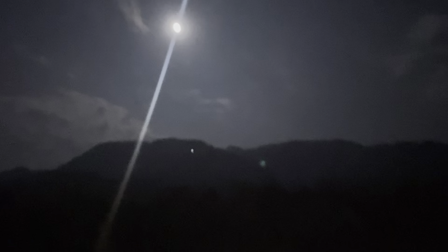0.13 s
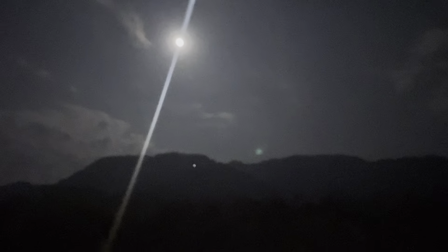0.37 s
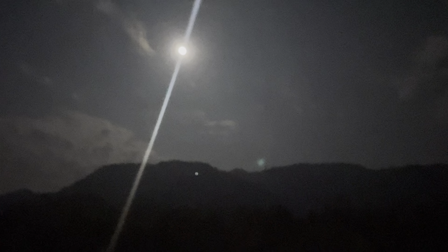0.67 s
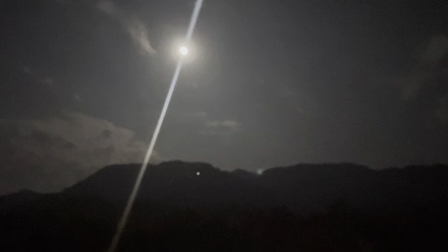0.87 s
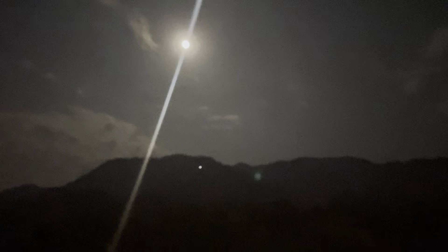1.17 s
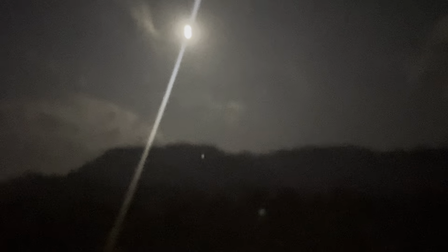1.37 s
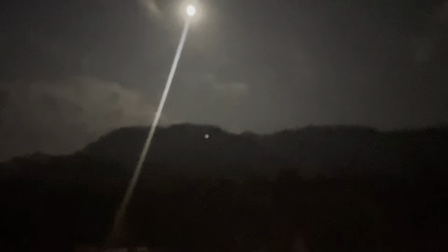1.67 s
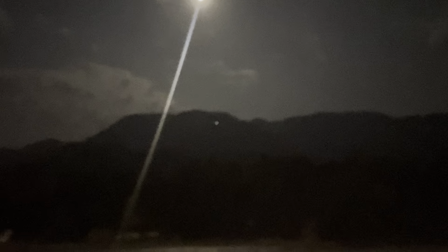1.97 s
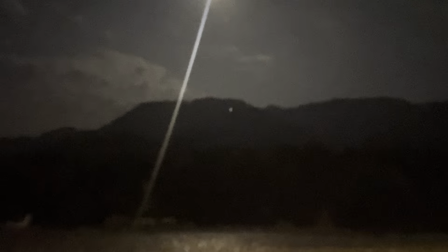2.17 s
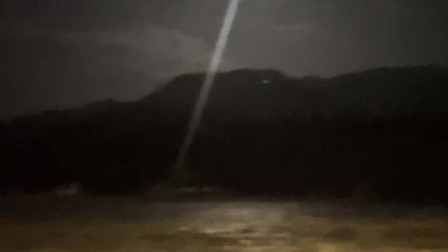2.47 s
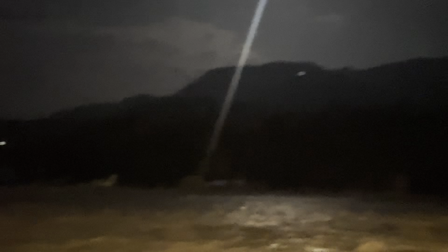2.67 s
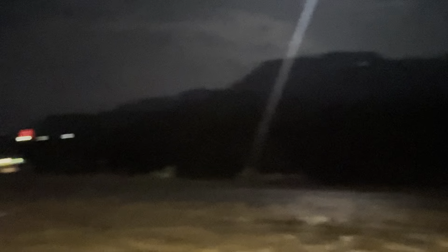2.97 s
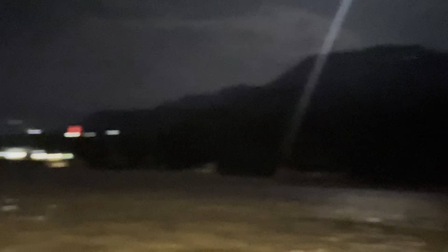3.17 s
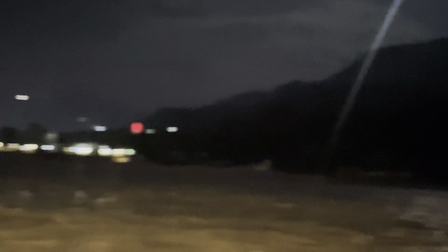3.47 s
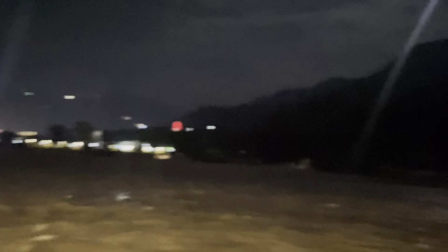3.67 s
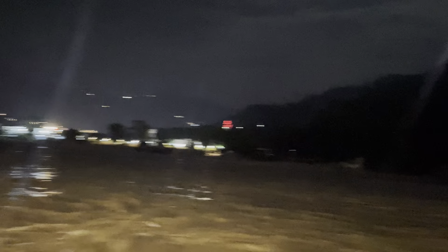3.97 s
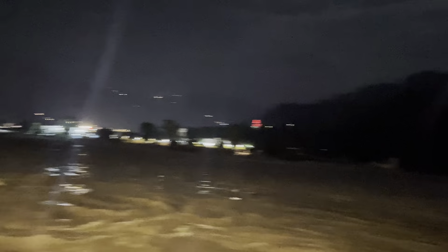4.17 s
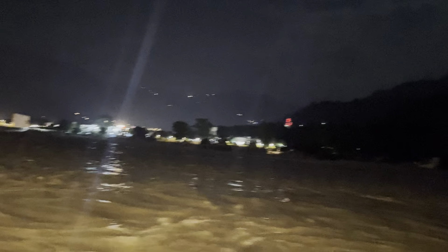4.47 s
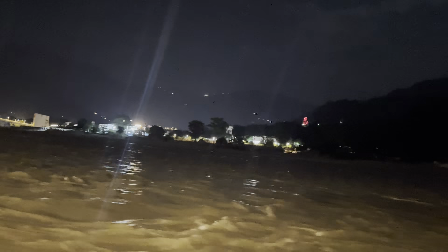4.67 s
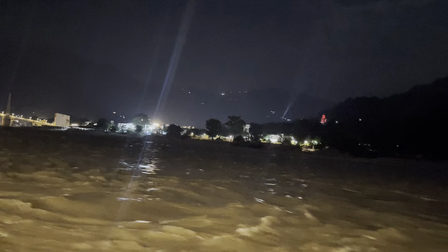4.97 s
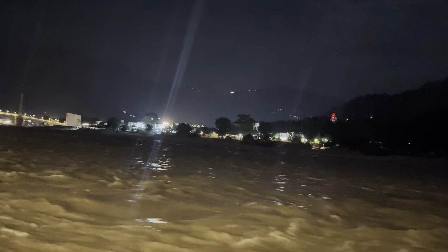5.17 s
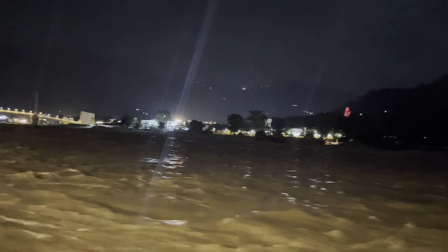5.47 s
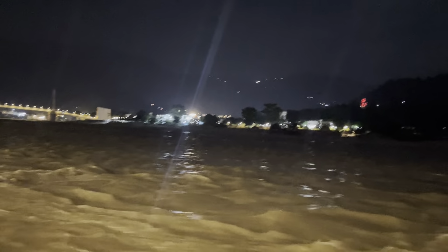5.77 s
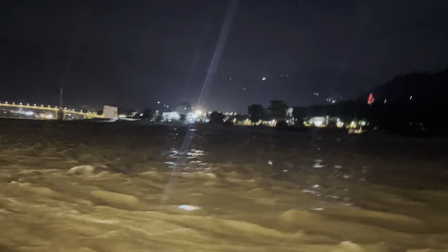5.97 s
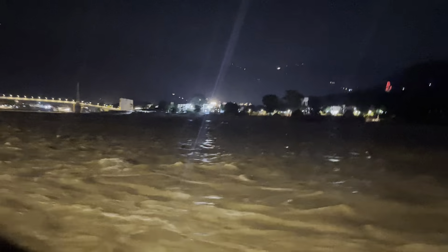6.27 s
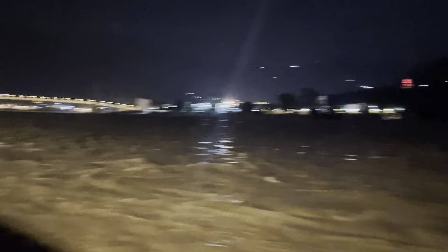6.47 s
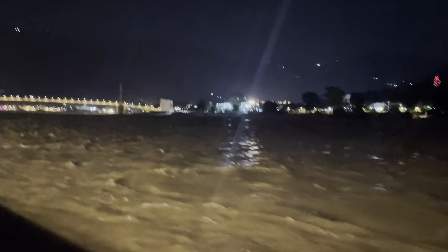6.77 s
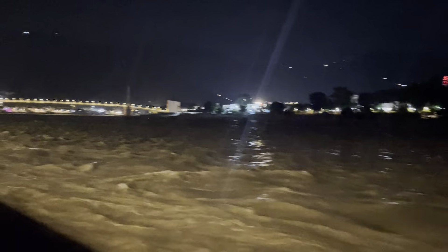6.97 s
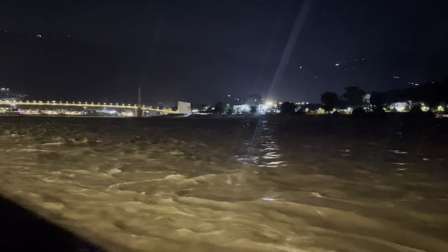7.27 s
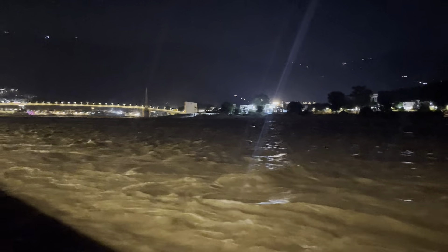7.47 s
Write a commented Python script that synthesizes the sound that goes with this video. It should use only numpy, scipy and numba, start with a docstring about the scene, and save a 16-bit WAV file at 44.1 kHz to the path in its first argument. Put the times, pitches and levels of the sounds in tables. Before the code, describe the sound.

A steady, dense rush of turbulent water runs throughout, close and wide in stereo, with little gurgles, slaps and plinking drops. Low wind buffeting bumps the phone microphone in irregular bursts during the first half, heaviest just after one second. From about four seconds the wind is mostly a faint rumble; near six seconds waves break harder, with brief rounded low gulps, before the river settles slightly darker.

```python
"""River bank: a swollen river rushes past while a phone turns slowly from the hills to the rapids. The river is
coloured noise (the rush) plus swarms of ringing bubbles, lifted by surges. Near crests slap as short resonant
noise bursts; drops and deep gulping bubbles are single decaying sines. Wind is low noise with gusts and
pressure pulses; two ports hear it all with lag and shade."""
import sys
import numpy as np
from scipy import signal
from scipy.fft import rfft, irfft
from scipy.io import wavfile
from scipy.ndimage import map_coordinates
from numba import njit

SR = 44100
rng = np.random.default_rng(int(sys.argv[2]) if len(sys.argv) > 2 else 0)


def output_pcm(signal):
    """Save a mono or channel-first signal as 16-bit PCM at the path in sys.argv[1].

    Samples are clipped to [-1, 1] before scaling.
    """
    pcm = np.clip(np.atleast_2d(signal).T, -1, 1) * 32767
    wavfile.write(sys.argv[1], SR, np.round(pcm).astype(np.int16))


N = 336042
T = np.arange(N) / SR
FRAME, HOP = 512, 128  # samples, short spectra

# wind rumble, relative spectrum before scaling to rms 1: (frequency [Hz], density [dB per Hz])
WIND_COLOUR = [(12, -32), (27, -26), (48, -6), (76, 1.5), (120, -2.5), (180, -7), (300, -20), (600, -53),
               (2000, -65)]
# steady breeze under the gusts, stronger once the phone faces the open water: (time [s], level [dB])
BREEZE_LEVELS = [(0, -44), (.6, -42.5), (2.2, -40.5), (3.8, -38.5), (4.8, -37.5), (5.8, -38.7), (7.62, -41)]
# gusts on the microphone: (start [s], hold [s], level [dB])
WIND_GUSTS = [(0.02, 0.025, -37), (0.763, 0.023, -28), (0.907, 0.067, -29.5), (1.02, .02, -40),
              (1.067, 0.15, -31), (1.233, 0.089, -30), (1.461, 0.06, -31), (1.594, 0.26, -34),
              (2.031, 0.082, -33), (2.535, 0.19, -37), (2.87, 0.3, -38), (3.155, 0.19, -37),
              (3.905, 0.044, -32), (4.11, 0.093, -43), (4.524, 0.027, -39)]
GUST_ATTACK_S, GUST_RELEASE_S = 0.025, 0.05
# strong eddies that hit the ports: (time [s], frequency [Hz], peak [dB], length to 1/e [s])
WIND_EDDIES = [(.07, 138.5, -32, 0.019), (.811, 124, -23.5, 0.011), (0.83, 85, -24.5, 0.014),
               (.986, 100.3, -18.5, 0.012), (1.275, 88, -12, 0.013), (1.317, 69, -18, 0.018),
               (1.517, 112, -19, 0.0046), (1.525, 176, -25, 0.016), (1.543, 54.4, -28, 0.059),
               (1.638, 139, -26.5, 0.011), (1.7, 85, -26, .016), (1.735, 140, -24, .014),
               (1.779, 105, -20, 0.0053), (1.814, 75, -22, 0.013), (1.843, 164, -26, 0.018),
               (1.897, 95, -25, 0.0097), (2.132, 148, -27, 0.021), (2.977, 79, -27.5, 0.034),
               (3.08, 70, -23, 0.015), (3.199, 55.6, -31, 0.018), (3.315, 79, -32, 0.021),
               (3.97, 80, -23.5, 0.015), (4.051, 65.6, -25, 0.013), (4.57, 86, -31, .016),
               (6.613, 90, -28, 0.009)]
# harder wind sheds smaller, higher eddies; they equal the rumble at this wind level
BUFFET_HZ, BUFFET_EQUAL_DB = 177, -19.5
# gusts alone heave, lower than the buffeting; level is relative to the gust's rumble
HEAVE_HZ, HEAVE_DB = 50, -9

# waves that break near the bank and the spits they throw:
# (time [s], centre [Hz], level [dB], length to 1/e^2 [s])
BANK_SPLASHES = [(.094, 880, -33, 0.011), (0.355, 1040, -34, 0.015), (0.4054, 10500, -43, 0.00066),
                 (0.592, 2500, -34, .006), (0.923, 3500, -37.5, .007), (1.052, 9200, -42, .002),
                 (1.1, 2000, -38.5, 0.018), (1.208, 3400, -40, 0.016), (1.438, 1110, -34, 0.025),
                 (1.445, 2640, -39, .02), (1.595, 8200, -43, .008), (1.634, 2650, -40, 0.013),
                 (2.022, 7150, -44, 0.014), (2.04, 1190, -40, 0.027), (2.155, 1480, -54, .018),
                 (2.418, 1900, -47, .015), (2.476, 1350, -38, .012), (2.498, 9200, -49, .008),
                 (3, 5000, -44, .008), (3.037, 1050, -34, .01), (3.06, 1400, -34, .02),
                 (3.294, 1700, -39, 0.0071), (3.296, 2900, -41, .005), (3.457, 7500, -44, 0.016),
                 (3.461, 3900, -38, 0.0062), (3.582, 2220, -42, 0.023), (3.647, 480, -32, 0.012),
                 (3.713, 1250, -33, 0.011), (3.915, 2280, -41, .009), (4.4783, 8000, -42, 0.00092),
                 (4.544, 3500, -43, .014), (4.548, 1250, -34, .016), (4.578, 2300, -43, 0.016),
                 (4.715, 574, -31, 0.013), (5.168, 1250, -37, .011), (5.851, 960, -30, .012),
                 (5.859, 1820, -33, 0.012), (5.886, 620, -32.5, .014), (5.898, 3100, -39, 0.012),
                 (5.926, 1620, -40, .01), (5.943, 1200, -38, .01), (6.251, 680, -34, 0.029),
                 (6.283, 3960, -42.5, 0.018), (6.386, 680, -35, 0.017), (6.39, 5400, -44, .009),
                 (6.478, 760, -34.5, 0.038), (6.6774, 12400, -47, .0007), (6.905, 570, -40, .018),
                 (6.9681, 9400, -44, .0008), (7.176, 1770, -46, 0.015)]
# deep gulping bubbles, decaying sines: (time [s], pitch [Hz], level [dB], ring [cycles])
LOW_GULPS = [(4.728, 280.4, -25, 34), (6.222, 267, -19.5, 20), (6.3, 282, -20, 25), (6.373, 271, -20, 26),
             (6.575, 233, -25.5, 31)]
# single bubbles and drops: (time [s], pitch [Hz], level [dB], ring [cycles])
WATER_DROPS = [(.405, 11500, -27.5, 40), (.725, 4800, -35, 40), (1.415, 1090, -25.5, 42),
               (1.441, 1110, -24.5, 36), (1.452, 1190, -31, 30), (3.291, 1770, -27, 42),
               (3.367, 2580, -36, 45), (4.478, 8500, -33, 45), (5.165, 1310, -33.5, 55),
               (5.599, 1360, -32, 55), (5.939, 1350, -30.5, 38), (6.6774, 12400, -39, 45),
               (6.968, 11000, -40, 50)]

# surges, where the current heaps up and breaks:
# (start [s], hold [s], change of roar [dB], of foam [dB], of spray [dB])
RIVER_SURGES = [(0, .1, 1, 0.78, -0.5), (0.559, .2, 0, 1.13, 1), (1, .42, 1, 3.5, 3),
                (1.918, .06, 1.5, 1.18, 0.5), (2.329, .26, 0.6, 1.61, 2), (2.72, .28, 0.9, 0.78, 0.3),
                (3.42, .33, 1.5, 1.48, 1.5), (4.378, .2, 1.2, 1.5, 2), (5.79, .22, -0.5, 3, 1.5),
                (6.19, .15, 1.5, 3, 3.5), (6.649, .08, 0, 1, -0.5), (6.859, .08, 0, 0.32, 0.5),
                (7.1, .1, 0, 0.58, 1.5)]
SURGE_ATTACK_S, SURGE_RELEASE_S = .06, .13
# river between surges; its spray fades as the phone turns: (time [s], foam [dB], spray [dB])
CALM_RIVER = [(0, 0.5, 8), (.45, -1, 5), (.8, -0.8, 5), (1.7, 0, 5.5), (3, -0.6, 3.5), (4.25, -1, -1),
              (4.85, 0.5, -1.5), (5.2, -1.1, -2), (5.5, 0.1, -1), (6.7, -.5, -2.5), (7.15, -1.5, -7.5),
              (7.62, 0.1, -5)]
ROAR_DB = 0.22  # between surges
# colour of the water before surges and patches:
# (frequency [Hz], facing hills [dB per Hz], facing midstream [dB per Hz], facing rapids [dB per Hz])
WATER_COLOUR = [(35, -103, -100.5, -95), (104, -60, -72, -63), (188, -63, -60.5, -61), (270, -62, -61, -58),
                (460, -62, -64, -63), (586, -64, -64, -65.5), (765, -69, -69, -63), (863, -68, -70, -70),
                (980, -70.5, -66.5, -67.5), (1190, -72.5, -71, -71), (1470, -71, -72.5, -72),
                (1680, -74.5, -75.5, -76.5), (1990, -74.5, -78, -77), (2690, -78, -78.5, -77),
                (3520, -79.5, -80, -81), (4620, -83.5, -83, -85), (5700, -86, -85.5, -85),
                (6930, -91, -86.5, -82.5), (13500, -98, -98, -96.5), (15400, -100, -99.5, -99)]
# low roar, foam in the middle, fine spray at the top:
# (frequency [Hz], share above roar [0-1], share of spray [0-1])
WATER_LAYERS = [(500, 0, 0), (1700, 1, 0), (4000, 1, 0), (9500, 1, 1)]

# turn of the phone: (time [s], heading [0 hills - 1 rapids], left port's lag, high-frequency limit [ms],
# right port's shade [dB])
PHONE_TURN = [(0, 0.11, 0.18, 3.5), (1.5, 0.024, 0.21, 2), (2.2, 0.086, 0.19, 4), (2.9, 0.28, 0.23, -0.5),
              (3.7, 0.54, 0.27, -2), (4.4, 0.6, 0.28, -2.5), (5.7, 0.97, 0.3, -4), (6.6, 1, 0.3, -6),
              (7.62, 1, 0.35, -4.5)]
# pair of ports: (frequency [Hz], likeness [0-1], share in step facing hills [1],
# share in step facing rapids [1], left minus right [dB], share of the shade [1])
PORT_PAIR = [(80, 0.71, 0.23, 1, -0.5, 0.0016), (285, 0.77, 0.29, 0.87, 2, 0), (395, 0.77, 0.28, 0, 2, 0),
             (570, 0.62, 0.075, 0, 0.5, 0.062), (740, 0.3, 0.012, 0.38, 0.5, 0.071),
             (910, 0.58, 0.36, 0, -0.5, 0), (1130, 0.57, 0.45, 0, -2, 0),
             (1860, 0.86, 0.65, 0.069, -1.5, 0), (2330, 0.86, 0.62, 0.18, 3, 0.9),
             (3300, 0.55, 0.41, 0.28, 2.5, 0.78), (4670, 0.74, 0.63, 0.45, 2.5, 0.28),
             (6200, 0, 0.37, 0.65, 5, 0.45), (6890, 1, 0, -4, -2, 0), (9300, 0.98, 0, 0, 1, 0),
             (11000, 0.94, 0, 0, -0.5, 0), (13800, 1, 0, 0, 0, 0)]
TREBLE_HZ, TREBLE_LAG_MS = 6600, .137
TOP_HZ = 15750


def amp(db):
    """Decibels to gain."""
    return 10 ** (np.asarray(db) / 20)


def unit(x):
    """Scale to rms 1."""
    return x / np.sqrt(np.mean(x ** 2))


def curves(table, t):
    """Columns of a time table at times t."""
    s, *columns = np.transpose(table)
    return [np.interp(t, s, c) for c in columns]


def spectra(table, hz):
    """Columns of a frequency table at hz, interpolated on a log axis."""
    points, *columns = np.transpose(table)
    return [np.interp(np.log(hz + 1), np.log(points), c) for c in columns]


def split(x):
    """Short spectra: column of frequencies, row of times, values."""
    hz, t, z = signal.stft(x, SR, nperseg=FRAME, noverlap=FRAME - HOP)
    return hz[:, None], t, z


def join(z):
    """Short spectra back to sound."""
    return signal.istft(z, SR, nperseg=FRAME, noverlap=FRAME - HOP)[1][..., :N]


def patches(hz, t, rate_hz, octaves):
    """Smooth random field of rms 1: new values rate_hz times a second, shared over some octaves."""
    where = np.broadcast_arrays(np.log2(1 + hz / 100) / octaves, t * rate_hz)
    grid = rng.standard_normal((48, 1024))
    return unit(map_coordinates(grid, where, order=2, mode="wrap"))


def envelope(t, start_s, hold_s, attack_s, release_s):
    """Envelope 0-1: straight rise, hold, exponential fall."""
    age_s = t - start_s
    fall_s = np.maximum(age_s - attack_s - hold_s, 0)
    return np.clip(age_s / attack_s, 0, 1) * np.exp(-fall_s / release_s)


def gusts(t):
    """Gust strength: each rises fast, holds and dies away; powers add."""
    each = [amp(db) * envelope(t, s, hold_s, GUST_ATTACK_S, GUST_RELEASE_S) for s, hold_s, db in WIND_GUSTS]
    return np.linalg.norm(each, axis=0)


def wind(flutter_db=1.5, buffet_width_hz=80, heave_width_hz=20):
    """Turbulence rumbles, buffets and heaves on the ports; an eddy is a short push and pull of pressure."""
    hz = np.arange(N // 2 + 1) * SR / N

    def noise(colour):
        return unit(irfft(rfft(rng.standard_normal((2, N))) * colour, N))

    def band(centre_hz, width_hz):
        return noise(1 / (1 + (2 * (hz - centre_hz) / width_hz) ** 2))

    gust = gusts(T)
    breeze = amp(curves(BREEZE_LEVELS, T)[0])
    strength = np.hypot(gust, breeze)
    rumble = strength * noise(amp(spectra(WIND_COLOUR, hz)[0]))
    flutter = np.interp(T, T[::HOP], patches(0, T[::HOP], rate_hz=24, octaves=1))
    # strength squared: buffeting outgrows the rumble
    buffet = strength ** 2 / amp(BUFFET_EQUAL_DB) * band(BUFFET_HZ, buffet_width_hz)
    heave = gust * amp(HEAVE_DB) * band(HEAVE_HZ, heave_width_hz)
    pressure = (rumble + buffet + heave) * amp(flutter_db * flutter)
    for s, eddy_hz, db, length_s in WIND_EDDIES:
        pulse = np.exp(-((T - s) / length_s) ** 2)
        pressure[0] += amp(db) * pulse * np.cos(2 * np.pi * eddy_hz * (T - s))
    return pressure


def splashes(relative_width=0.35):
    """Near crests slap and spit in short bursts of resonant noise."""
    out = np.zeros(N)
    for s, hz, db, length_s in BANK_SPLASHES:
        resonance = signal.iirpeak(hz, 1 / relative_width, SR)
        burst = unit(signal.filtfilt(*resonance, rng.standard_normal(8192)))
        t = (np.arange(len(burst)) - len(burst) // 2) / SR
        first = int((s + t[0]) * SR)
        out[first:first + len(t)] += amp(db) * burst * np.exp(-2 * (t / length_s) ** 2)
    return out


@njit
def ring(start_s, hz, size, cycles, rise):
    """Each ring is a sine that builds in about a cycle and dies within its cycles as its pitch rises."""
    out = np.zeros(N)
    for k in range(len(start_s)):
        length = int(cycles[k] * SR / hz[k]) + 1
        first = int(start_s[k] * SR)
        phase = 0.
        for i in range(min(length, N - first)):
            phase += 2 * np.pi * hz[k] * (1 + rise * i / length) / SR
            build = 1 - np.exp(-phase / 3)
            decay = np.exp(-6.9 * i / length)  # 60 dB over the ring
            out[first + i] += size[k] * build * decay * np.sin(phase)
    return out


def ring_table(table, rise):
    """Ring each row of a table once."""
    s, hz, db, cycles = np.array(table, float).T.copy()
    return ring(s, hz, amp(db), cycles, rise)


def surges(t):
    """Roar, foam and spray relative to calm [dB]: each surge builds, holds and ebbs."""
    return sum(np.outer(change_db, envelope(t, s, hold_s, SURGE_ATTACK_S, SURGE_RELEASE_S))
               for s, hold_s, *change_db in RIVER_SURGES)


def bubbles(count, low_hz, high_hz, cycles, spread_db, rise=0.053):
    """Near-flat swarm of rms 1: many faint bubbles and few loud ones, thicker when waves break."""
    when, pitch, luck, life, side = rng.random((count, 5)).T
    churn = np.cumsum(amp(surges(T)[1]))  # foam sets the density
    start_s = np.interp(when, churn / churn[-1], T)
    hz = low_hz + (high_hz - low_hz) * pitch ** 2
    polarity = np.sign(side - .5)
    size = polarity * hz ** .75 * amp(-spread_db * np.log(luck + .008))
    return unit(ring(start_s, hz, size, cycles * (.5 + life), rise))


def river(rush_db=-1.4, bubble_db=-13, fizz_db=-9, gurgle_db=-24, swell_db=0.63, patch_db=0.78, flicker_db=0.73):
    """Two unrelated sheets: far bubbles merge into a rush, near ones stand out; all churns in patches."""
    near = amp(bubble_db) * bubbles(count=9000, low_hz=714, high_hz=6220, cycles=22.0, spread_db=3.0)
    fizz = amp(fizz_db) * bubbles(count=6000, low_hz=5340, high_hz=15400, cycles=14.0, spread_db=2.0)
    gurgle = amp(gurgle_db) * bubbles(count=900, low_hz=208, high_hz=1111, cycles=28, spread_db=1.9, rise=.12)
    rush = amp(rush_db) * rng.standard_normal((2, N))
    water = rush + np.array([near + fizz + gurgle, np.zeros(N)])
    hz, t, z = split(water * np.sqrt(SR / 2))  # rms 1 becomes unit power per Hz
    roar_db, foam_db, spray_db = surges(t) + np.broadcast_arrays(ROAR_DB, *curves(CALM_RIVER, t))
    facing = 2 * curves(PHONE_TURN, t)[0] - 1  # -1 hills, 0 midstream, 1 rapids
    hills, midstream, rapids = spectra(WATER_COLOUR, hz)
    colour_db = midstream + abs(facing) * (np.where(facing < 0, hills, rapids) - midstream)
    above_roar, mist = spectra(WATER_LAYERS, hz)
    db = colour_db + (1 - above_roar) * roar_db + (above_roar - mist) * foam_db + mist * spray_db
    db = db + swell_db * patches(hz, t, rate_hz=75, octaves=3.3)
    db = db + patch_db * patches(hz, t, rate_hz=16, octaves=0.588)
    db = db + flicker_db * patches(hz, t, rate_hz=70, octaves=0.561)
    return join(z * amp(db))


def microphone(field):
    """Two ports share one part of the field and differ by the other; left lags, shade tips the balance."""
    hz, t, (shared, diffuse) = split(field)
    heading, lag_ms, shade_db = curves(PHONE_TURN, t)
    likeness, hills, rapids, tilt_db, shade = spectra(PORT_PAIR, hz)
    in_step = np.clip(hills + heading * (rapids - hills), 0, 1)
    # long waves bend round the phone's body and take longer
    lag_ms = lag_ms * (1 + 1.194 / (1 + (hz / 850) ** 2))
    spin_per_ms = 2j * np.pi * hz / 1000
    cross = in_step + (1 - in_step) * np.exp(spin_per_ms * lag_ms)
    # top treble: one small lag, opposite polarity, whatever the heading
    cross = np.where(hz < TREBLE_HZ, cross, -np.exp(spin_per_ms * TREBLE_LAG_MS))
    likeness = np.clip(likeness * np.sqrt(abs(cross)), 0, 1)
    shared = shared * np.sqrt((1 + likeness) / 2)
    diffuse = diffuse * np.sqrt((1 - likeness) / 2)
    pan = amp((tilt_db + shade * shade_db) / 2)
    left = (shared + diffuse) * np.exp(-1j * np.angle(cross)) * pan
    right = (shared - diffuse) / pan
    return join(np.array([left, right]) / np.sqrt((pan ** 2 + pan ** -2) / 2))


def scene():
    """Water, deep gulps and wind reach the phone from the side; drops lie ahead and reach both ports together."""
    bank = splashes() + ring_table(LOW_GULPS, rise=.1)
    field = river() + wind() + np.array([bank, np.zeros(N)])
    return microphone(field) + ring_table(WATER_DROPS, rise=0.044)


def record(dry):
    """The phone cuts the top: steep elliptic low-pass."""
    low_pass = signal.ellip(10, .2, 80, TOP_HZ, fs=SR, output="sos")
    return signal.sosfilt(low_pass, dry)


dry = scene()
out = record(dry)
output_pcm(out)
```